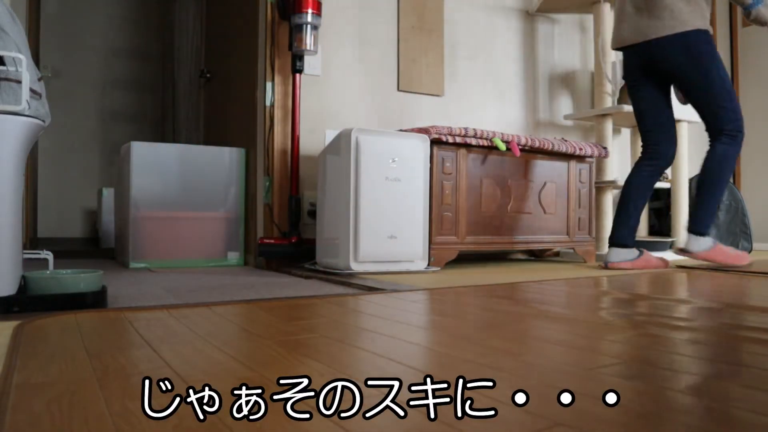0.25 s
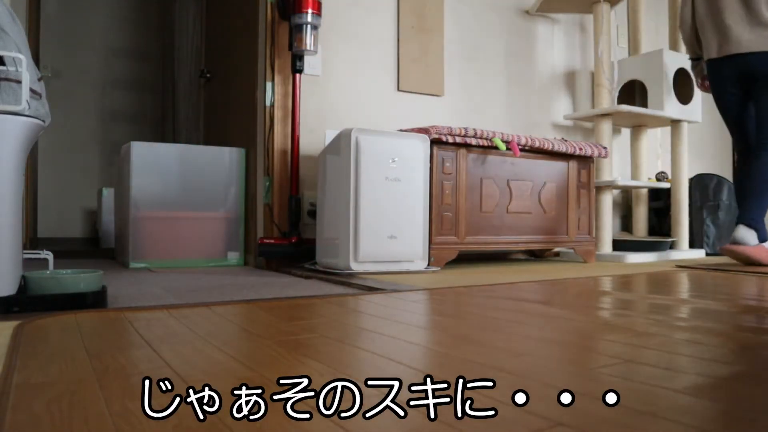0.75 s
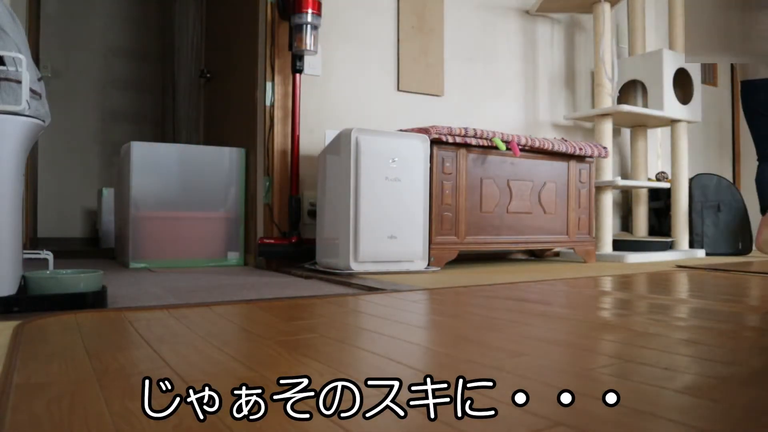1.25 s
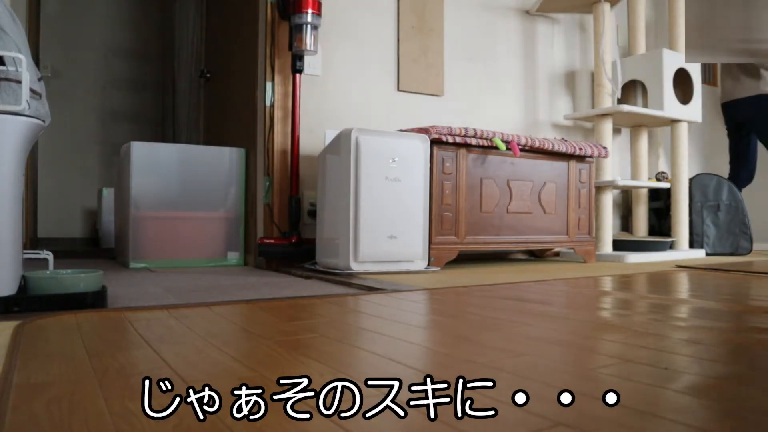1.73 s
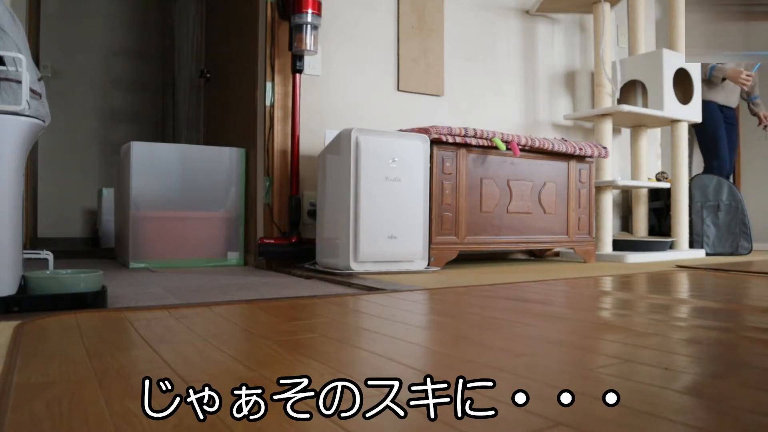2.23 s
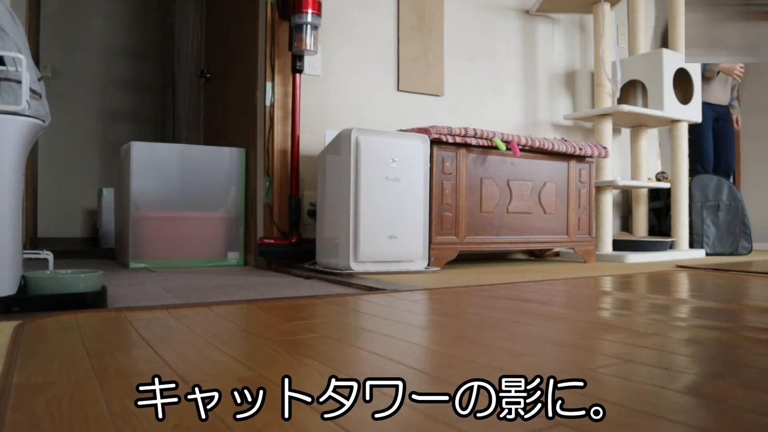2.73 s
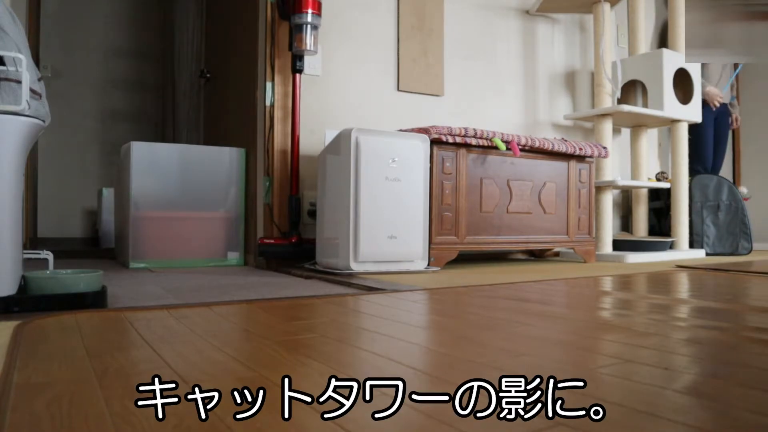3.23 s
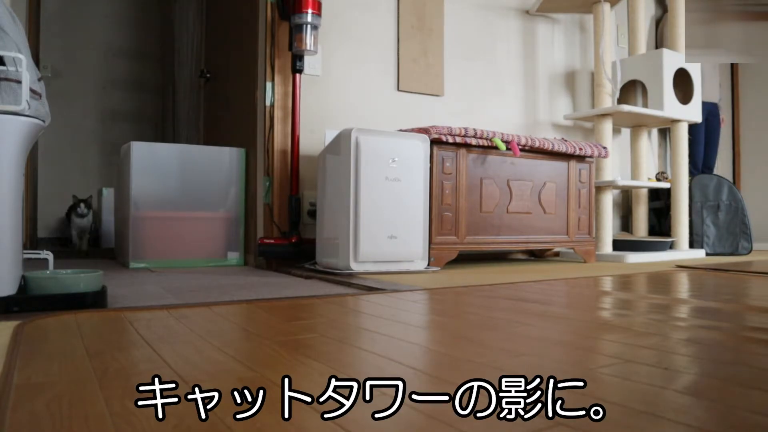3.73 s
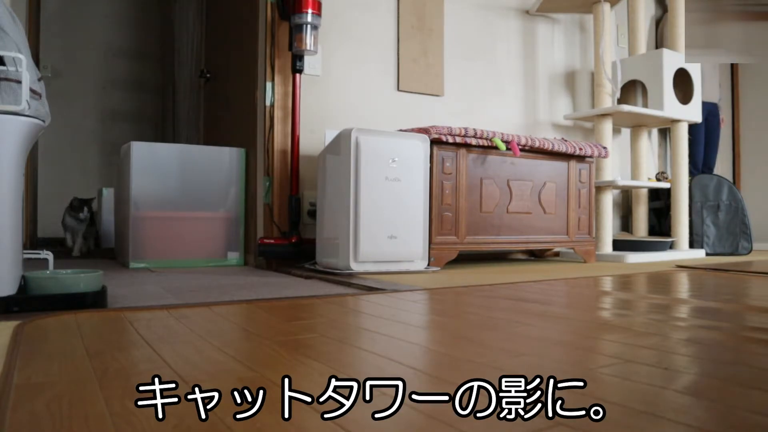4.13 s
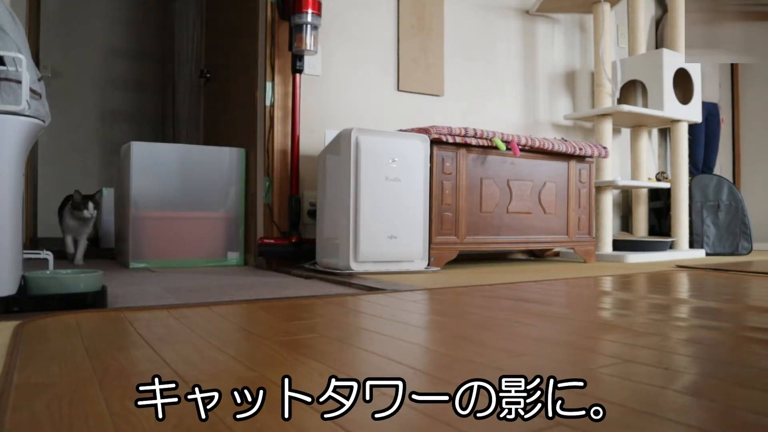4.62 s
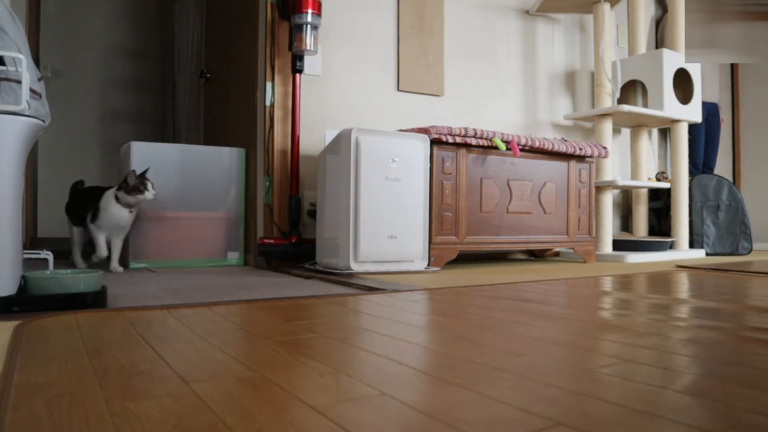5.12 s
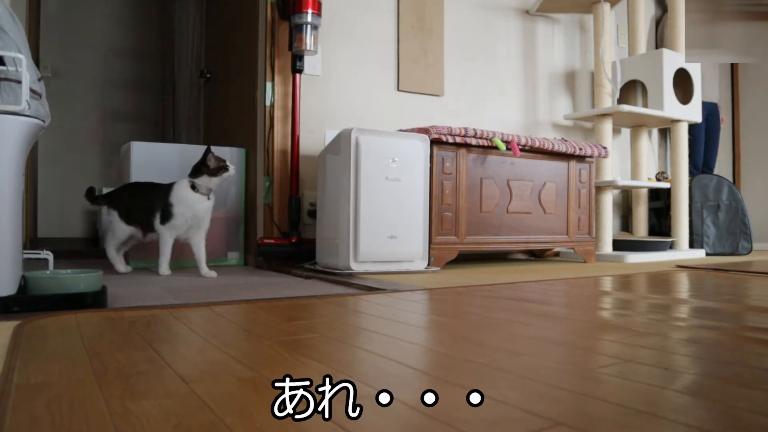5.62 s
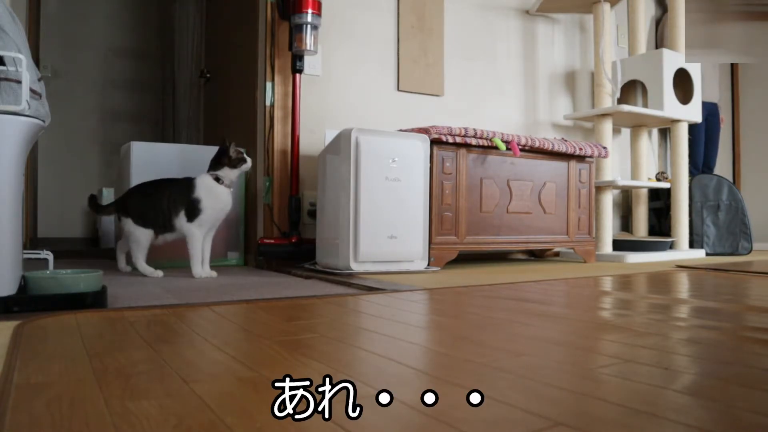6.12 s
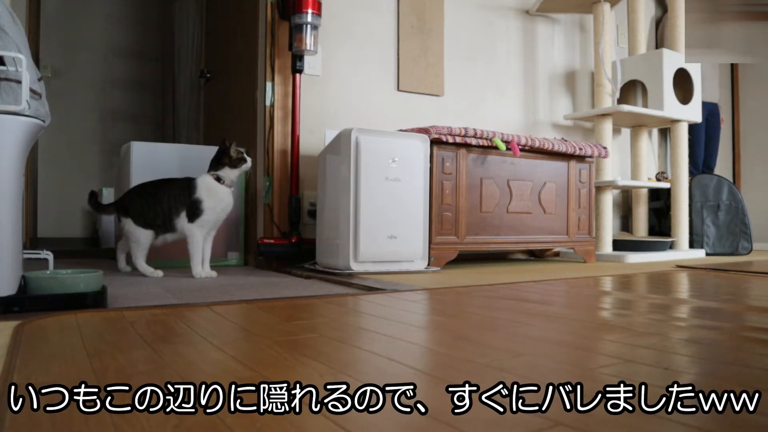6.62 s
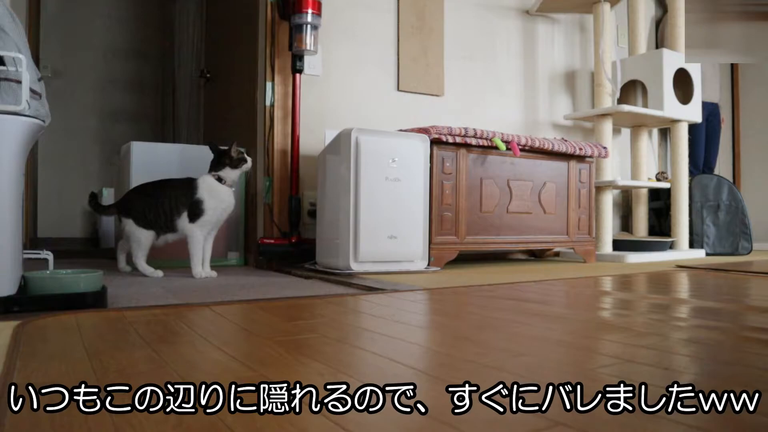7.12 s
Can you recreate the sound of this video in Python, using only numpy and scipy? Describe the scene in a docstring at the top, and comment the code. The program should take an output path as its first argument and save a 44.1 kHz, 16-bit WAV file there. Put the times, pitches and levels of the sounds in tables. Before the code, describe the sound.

Soft slipper shuffles and heel knocks over low room drone, a brief shift to wider air, then a cat's tiny muffled bell tinkling.

```python
"""Slippers and a collar bell in a small room

Felt slippers scuff and pat over a wooden floor: sliding noise, edge ticks and knocks on board modes. Later a cat
walks in; pellet strikes ring its collar bell in short sines. Behind them an appliance hums and drones, air hushes,
and far traffic swells as noise with rising engine tones. The microphone pair hears bass alike and treble largely in
opposite phase; for a moment the background cuts out, returns wide, and soft tinkles and rustles swell."""
import sys
import numpy as np
from scipy import signal
from scipy.fft import rfft, irfft, next_fast_len
from scipy.io import wavfile
from scipy.ndimage import uniform_filter1d, map_coordinates

SR = 44100
rng = np.random.default_rng(int(sys.argv[2]) if len(sys.argv) > 2 else 0)


def pcm_store(signal):
    """Save signal as 16-bit PCM."""
    levels = np.round(np.clip(np.atleast_2d(signal), -1, 1) * 32767)
    wavfile.write(sys.argv[1], SR, levels.astype(np.int16).T)


N = 324576

# Levels of the sources are set at the source, before distance, room and microphone pair.
# soles sliding: (contact [s], slide length [s], level [dB], treble re hiss [dB], scrape re hiss [dB])
SCUFFS = [(0, 0.021, -47.5, 2.5, -16), (0.069, 0.059, -46, -8, 1.5), (0.127, 0.031, -39, 4, -6),
          (0.18, 0.05, -43, -15, -3.5), (0.288, 0.036, -43, -3, -18), (0.348, 0.089, -48, -4, -27),
          (0.43, 0.06, -43.5, -6, -5), (0.49, 0.069, -46, -6, 0), (0.56, 0.026, -39.5, -1.5, -7.5),
          (0.581, 0.034, -39.5, 0.5, -7), (0.637, 0.046, -40, -3, -10), (.695, 0.064, -39, -9, -8),
          (0.777, 0.033, -42, -2.5, -9.5), (0.864, 0.04, -47, 1, -3), (0.975, 0.038, -49.5, 1.5, -27),
          (1.138, 0.02, -47, 2, -15), (1.155, 0.047, -44, -4, -9), (1.374, 0.025, -46, -2, -13),
          (1.402, 0.033, -46, -3, -13), (1.854, 0.022, -49, -4, -3), (1.873, 0.046, -47, -1.5, 3.5),
          (1.929, 0.022, -48, 6, -9)]
# sole edges ticking on the floor: (time [s], level [dB])
EDGE_TICKS = [(0.121, -31), (0.136, -20), (0.141, -21), (0.1574, -34), (0.2094, -40), (0.229, -34),
              (0.288, -31), (0.3136, -23), (0.4174, -37), (0.4476, -29), (0.5656, -41), (0.6615, -32),
              (0.7084, -38), (0.8719, -37), (0.99, -35), (1.3882, -40), (1.9, -38)]
# heels knocking the boards: (time [s], level [dB], hardness [0-1], press [s])
KNOCKS = [(0.158, -22, 0.5, 0.0091), (.208, -26, 1, 0.011), (.225, -30, 1, .006), (0.191, -30, 1, 0.0097),
          (.279, -27, 0.3, .002), (.363, -25, 0.17, 0.014), (.417, -24, 0.45, 0.024),
          (0.5654, -29, 1, .002), (0.5737, -26, 1, 0.0054), (0.592, -29, 0.9, 0.0093),
          (1.3855, -19, 0, 0.0056), (1.392, -20, 0.1, 0.0072), (1.402, -23, 0, .006),
          (1.412, -25.5, 0, 0.0045), (1.9, -21.5, .9, 0.001), (1.905, -21, 0.75, 0.006),
          (1.93, -29, .8, .006), (1.941, -27.5, 0.8, .006), (1.959, -26, 0.4, 0.0032)]
# floor board modes, low three then high three: (frequency [Hz], width [Hz], level [dB])
BOARD_MODES = [(353, 90, 5), (707, 110, 7), (1014, 310, -0.5), (1130, 290, 2), (1740, 800, 2),
               (2440, 1260, 0)]
# colour of felt hissing on wood: (frequency [Hz], relative level [dB per Hz])
FELT_COLOUR = [(1200, -43), (2400, -18), (3180, -0.5), (3850, -4), (5500, -4), (8050, -8), (9200, -10.5),
               (10600, -7.5), (12000, -9.5), (13200, -20), (15500, -55)]
# colour of boards under a loaded sole: (frequency [Hz], relative level [dB per Hz])
SCRAPE_COLOUR = [(600, -48), (1000, -4), (1600, 4.5), (2200, 6), (2800, 2.5), (3600, -37)]
# collar jolts: (time [s], strike level [dB], loss at each rebound [dB], lasting tone under strike [dB])
JOLTS = [(3.958, -44, 12, 14), (3.979, -46, 10, 22), (3.991, -41, 14, 30), (4.0095, -40, 17, 30),
         (4.0185, -30, 15, 30), (4.0232, -22, 25, 30), (4.03, -22.5, 6, 22), (4.0628, -35, 0.5, 25),
         (4.1336, -33, 10, 30), (4.1401, -27, 25, 30), (4.1465, -28.5, 5, 24), (4.193, -31, 3, 25),
         (4.206, -29, 9, 18), (4.218, -40, -2.5, 25), (4.239, -34, 12, 30), (4.2487, -21.5, 5, 23),
         (4.264, -27, 3, 25), (4.2967, -39, 10, 25), (4.466, -47, 8, 20), (4.565, -48, 5, 20),
         (4.59, -47, 5, 20), (4.615, -47, 5, 20), (4.637, -27, 14, 23), (4.698, -30, 17, 30),
         (4.71, -22, 16, 26), (4.7169, -22.5, 5, 28), (4.748, -23, 12, 26), (4.761, -26, 6, 25),
         (4.9003, -42, 8, 21), (4.935, -32, 15, 30), (4.942, -15.5, 20, 15), (4.9476, -17, 6, 25),
         (4.9746, -25, 15, 26), (5.0084, -19.5, 17, 33), (5.126, -43, 13, 30), (5.1366, -37, 15, 25),
         (5.7183, -39.5, 2, 24)]
# partials of the damped bell shell: (frequency [Hz], mean level [dB], t60 [s])
BELL_PARTIALS = [(7626, 2, 0.014), (7800, -8, 0.012), (7470, -6.5, 0.013), (8090, -13.5, 0.015)]
# soft dry swells: (centre time [s], length [s], level before shaping [dB], centre [Hz], width [Hz])
SWELLS = [(3.24, 0.044, -69, 7600, 300), (3.293, .035, -63, 7600, 300), (3.373, .03, -70, 9000, 6000),
          (3.404, 0.057, -49, 7530, 500), (3.428, 0.045, -65, 11500, 1200), (3.413, .012, -53, 5000, 4000),
          (3.447, .015, -57, 3500, 2500), (3.459, 0.028, -50.5, 4040, 2000),
          (3.457, .02, -47.5, 1900, 1300), (3.46, 0.037, -56.5, 8950, 7040), (3.492, 0.028, -51, 7300, 350),
          (3.52, 0.038, -47.5, 7660, 400), (3.545, .035, -55, 7500, 300), (3.6, .02, -64, 9000, 6000)]
# decay of the room: (frequency [Hz], t60 [s])
ROOM_DECAY = [(300, 0.46), (3000, 0.28), (8000, 0.3), (14000, 0.18)]
# side over mid at the microphone pair: (frequency [Hz], level [dB])
PAIR_WIDTH = [(40, -51), (90, -48), (200, -23.5), (380, -7), (700, -7.5), (1290, -2.5), (2380, 1.5),
              (4400, 4), (8120, 6), (15000, 10)]
# side over mid while the background is spread: (frequency [Hz], level [dB])
SPREAD_WIDTH = [(60, -14), (110, -11), (200, -3.5), (380, 1), (700, 0), (1290, -0.5), (2380, -0.5),
                (4400, 0), (8120, -1), (15000, -3)]
# colour change of the spread background: (frequency [Hz], gain [dB])
SPREAD_LIFT = [(100, -5), (800, -5.5), (3000, -2.5), (8000, 0.5), (14000, 8)]
# far traffic coming and going: (time [s], level [dB])
TRAFFIC_LEVEL = [(0, -48), (1.5, -49), (2.9, -49.5), (4.6, -45), (5.5, -41), (6.1, -39.5), (6.5, -40),
                 (7.36, -45.5)]
# colour of far traffic: (frequency [Hz], relative level [dB per Hz])
TRAFFIC_COLOUR = [(200, -30), (450, -2), (600, -14.5), (760, -0.5), (860, -2), (950, -2), (1100, -8),
                  (1700, -9), (2350, -11), (2800, -20), (5000, -37), (9000, -120)]
# engines in the traffic speeding up, one list each: (time [s], pitch [Hz], level [dB])
ENGINES = [
    [(3.75, 49, -52), (4.1, 53.2, -48), (4.45, 56.2, -55), (4.52, 63.4, -56), (4.64, 67.8, -43),
     (5, 71.5, -40), (5.33, 76.7, -44), (5.45, 76.6, -58), (5.7, 79.2, -46), (6, 82, -35), (6.15, 82, -41)],
    [(6.25, 129, -41), (6.4, 130.7, -33), (6.55, 137.6, -30.5), (6.68, 142, -42)],
]
# appliance drone in the room's low resonances: (frequency [Hz], relative level [dB per Hz])
DRONE_COLOUR = [(40, -120), (70, -44), (97, -7), (128, 0.5), (172, -7), (183, -4), (235, 0.5), (255, -11.5),
                (275, -2), (297, -19.5), (315, -10), (368, -24.5), (500, -32.5), (900, -120)]
# colour of the deep rumble: (frequency [Hz], relative level [dB per Hz])
RUMBLE_COLOUR = [(8, -33), (15, -5.5), (43, -1), (70, 4), (95, 2.5), (140, -58), (300, -120)]
# colour of the room's steady air: (frequency [Hz], relative level [dB per Hz])
HUSH_COLOUR = [(150, -57), (300, 3), (420, 0.5), (670, -0.5), (800, -5), (1200, -5.5), (2000, -13.5),
               (3800, -18.5), (6000, -27), (10900, -41.5), (13700, -50), (15500, -83)]

# slides: rise, fading along the slide, fading once the sole lifts
SCUFF_ATTACK_S, SAG_DB_PER_S, LIFT_DB_PER_S = 0.0097, 19, 249
BRIGHTEN_DB_PER_S, LIGHTEN_DB_PER_S = 5, 4  # treble grows and scrape shrinks as weight leaves the sole
DRAG_DB, DRAG_UNTIL_S = -56, 1.58  # faint hiss between the steps
CATCH_HZ, CATCH_WIDTH_HZ, CATCH_GAIN = 3980, 560, 1.94  # the sole's own resonance
KNOCK_T60_S, IMPACT_DB = 0.025, 20  # decay after the press; first instant over the pressing
REBOUND_S = 0.0057  # pellet flights last 0.6 to 1.9 times this
ROLL_START_S, ROLL_END_S, ROLL_DB = 3.6, 4.7, -52  # random faint strikes, at most this level
TONE_HZ, TONE_HOLD_S, TONE_T60_S = 7570, 0.033, 0.04  # lasting tone: mean pitch, hold until fur touches, decay
TICK_DB, TICK_T60_S = -27, 0.003  # dry contact of pellet and shell, under the strike
BELL_TOP_HZ = 12500  # the whole bell is dulled above this
SCATTER_S = 0.004  # mean extra delay of sound scattered off near furniture
SPREAD_START_S, SPREAD_END_S = 3.188, 3.637
RUMBLE_DB, RUMBLE_RISE_DB_PER_S = -44, 0.87  # mean level at the start, slow growth
DRONE_DB, DRONE_RISE_DB_PER_S, HUSH_DB = -33, 0.217, -44.5
HUM_HZ, HUM_DB = 118.3, -43  # the appliance
TOP_HZ = 15700  # band limit of the microphones


def slippers():
    """Felt soles hiss and scrape while they slide, heels knock the boards; edge ticks are returned apart."""
    felt, bright, weight = strokes()
    # fibres catch unevenly
    grit = amp(2 * wobble(300) + 1.5 * wobble(90)) * patchy(depth_db=2.5)

    def felt_response(hz):
        catch = 1 + (CATCH_GAIN - 1) * resonance(hz, CATCH_HZ, CATCH_WIDTH_HZ)
        return amp(along(FELT_COLOUR, hz)) * catch

    hiss = unit(filtered(grit, felt_response))
    treble = filtered(hiss, lambda hz: 1 / (1 + (7500 / (hz + 1)) ** 6))
    scrape = unit(filtered(grit, lambda hz: amp(along(SCRAPE_COLOUR, hz))))
    slide = felt * (hiss - treble) + bright * treble + weight * scrape
    return slide + heel_knocks(), edge_ticks()


def strokes():
    """Gains of felt hiss, its treble and the scrape: each slide rises, sags, then dies as the sole lifts."""
    t, u = np.arange(N) / SR, np.arange(SR // 2) / SR
    drag_db = DRAG_DB - LIFT_DB_PER_S * np.maximum(t - DRAG_UNTIL_S, 0)
    power = np.outer([1, 1, 0.1], amp(2 * drag_db))  # doubled dB gives power
    for s, length, db, bright_db, weight_db in SCUFFS:
        fall_db = SAG_DB_PER_S * u + LIFT_DB_PER_S * np.maximum(u - length, 0)
        shape = np.clip(u / SCUFF_ATTACK_S, 0, 1) * amp(db - fall_db)
        treble_db = bright_db + BRIGHTEN_DB_PER_S * u
        scrape_db = weight_db - LIGHTEN_DB_PER_S * u
        layers = shape * amp([0 * u, treble_db, scrape_db])
        power[:, round(s * SR):][:, :len(u)] += layers ** 2
    return np.sqrt(power)


def patchy(depth_db):
    """White noise whose bands swell and fade in small unrelated patches."""
    z = signal.stft(rng.standard_normal(N + 256), nperseg=256)[2]
    field = uniform_filter1d(rng.standard_normal(z.shape), size=5, axis=0)
    field = uniform_filter1d(field, size=5, axis=1)
    return signal.istft(z * amp(depth_db * unit(field)), nperseg=256)[1][:N]


def heel_knocks():
    """An impact and a noisy press excite damped board modes; hard blows reach the high ones."""
    blows, t = np.zeros((2, N)), np.arange(SR // 10) / SR
    for s, db, hard, press in KNOCKS:
        hard = np.clip(hard, 0, 1)
        envelope = amp(db - 60 * np.maximum(t - press, 0) / KNOCK_T60_S) * (1 - np.exp(-t / 0.001))
        push = envelope * rng.standard_normal(len(t))
        push[0] = amp(db + IMPACT_DB)
        blows[:, round(s * SR):][:, :len(t)] += np.outer([1 - hard, hard], push)

    def wood(f, modes):
        # neighbouring modes alternate in sign
        return sum((-1) ** k * amp(db) * resonance(f, hz, width) for k, (hz, width, db) in enumerate(modes))

    def boards(f):
        low_and_high = np.array([wood(f, BOARD_MODES[:3]), wood(f, BOARD_MODES[3:])])
        return low_and_high / (1 + (f / 4000) ** 4)

    return filtered(blows, boards).sum(axis=0)


def edge_ticks():
    """Sole edges give short noise bursts through one broad resonance."""
    ticks, t = np.zeros(N), np.arange(SR // 10) / SR
    for s, db in EDGE_TICKS:
        ticks[round(s * SR):][:len(t)] += amp(db - 60 * t / 0.012) * rng.standard_normal(len(t))
    return filtered(ticks, lambda f: resonance(f, 5600, 9000) / (1 + (f / 12500) ** 12))


def bell():
    """The shell, damped by fur, rings briefly at each pellet strike; one tone lasts longer after a jolt."""
    out, t = np.zeros(N), np.arange(SR // 20) / SR
    for s, db in pellet_strikes():
        ring = np.zeros(len(t))
        for hz, level, t60 in BELL_PARTIALS:
            ring += amp(level + rng.normal(0, 1.7) - 60 * t / t60) * np.sin(2 * np.pi * hz * t)
        contact = amp(db + TICK_DB - 60 * t / TICK_T60_S) * np.diff(rng.standard_normal(len(t) + 1))
        out[round(s * SR):][:len(t)] += amp(db) * ring * (1 - np.exp(-t / 0.00055)) ** 2 + contact
    u = np.arange(SR // 4) / SR
    for s, db, _, under_db in JOLTS:
        decay = amp(db - under_db - 60 * np.maximum(u - TONE_HOLD_S, 0) / TONE_T60_S)
        tone = decay * np.sin(2 * np.pi * (TONE_HZ + rng.normal(0, 12.6)) * u)
        out[round(s * SR):][:len(u)] += tone * (1 - np.exp(-u / 0.0037))
    return filtered(out, lambda hz: 1 / (1 + (hz / BELL_TOP_HZ) ** 12))


def pellet_strikes():
    """Times and levels of strikes: each jolt with four rebounds, plus faint random ones."""
    flights = np.cumsum(REBOUND_S * rng.uniform(0.6, 1.9, size=(len(JOLTS), 4)), axis=1)
    strikes = []
    for (s, db, loss_db, _), lags in zip(JOLTS, flights):
        strikes += [(s + lag, db - loss_db * k) for k, lag in enumerate([0, *lags])]
    for when, soft in rng.random(size=(30, 2)):
        strikes.append((ROLL_START_S + (ROLL_END_S - ROLL_START_S) * when, ROLL_DB - 6 * soft))
    return strikes


def swells():
    """Blurred tinkles and rustles: band noise under a round envelope, unrelated in mid and side."""
    out, f = np.zeros((2, N)), np.fft.rfftfreq(4096, 1 / SR)
    t = (np.arange(4096) - 2048) / SR
    for s, length, db, hz, width_hz in SWELLS:
        response = resonance(f, hz, width_hz) ** 2 / (1 + (f / 13500) ** 12)
        band = irfft(rfft(rng.standard_normal((2, len(t)))) * response)
        shape = np.cos(np.pi * np.clip(t / length, -0.5, 0.5)) ** 2
        out[:, round((s + t[0]) * SR):][:, :len(t)] += amp(db) * unit(band) * shape
    return out * amp([[0], [3]])  # the side is 3 dB stronger


def heard(x, direct_db, wet_db, wide_db, left, scatter):
    """Source at the pair: side about a quarter cycle ahead, wider with pitch, a share scattered by furniture."""
    knots = np.arange(0, SR / 2, 150)
    # each band of the scattered share arrives after its own delay
    turns = np.cumsum(SCATTER_S * rng.uniform(0, 2, size=len(knots))) * knots[1]
    share = np.clip(scatter, 0, 1)

    def furniture(hz):
        late = np.exp(-2j * np.pi * np.interp(hz, knots, turns))
        return np.sqrt(1 - share) + np.sqrt(share) * late

    direct = np.array([amp(direct_db) * x, filtered(x, furniture)])
    mid, side = direct + amp(wet_db) * room(x)
    return np.array([mid, filtered(side, lambda hz: (1j + left) * amp(along(PAIR_WIDTH, hz) + wide_db))])


def room(x):
    """Mid and side of the room's answer: a noise tail in which each frequency dies at its own speed."""
    hz, t, z = signal.stft(rng.standard_normal((2, SR // 2)), SR, nperseg=256)
    decay = amp(-60 * t / along(ROOM_DECAY, hz)[:, None])
    tail = signal.istft(z * decay, SR, nperseg=256)[1]
    late = np.pad(x, (150, 0))[None]  # the tail sets in 150 samples after the direct sound
    return signal.fftconvolve(late, tail / np.linalg.norm(tail[0]), axes=1)[:, :N]


def background():
    """Mid and side of rumble, drone, air and traffic: unrelated noises of one colour, with shared tones."""
    traffic_db, = curves(TRAFFIC_LEVEL)
    t = np.arange(N) / SR
    air = amp(RUMBLE_DB + RUMBLE_RISE_DB_PER_S * t + 0.52 * wobble(1.5)) * coloured(RUMBLE_COLOUR)
    air += amp(DRONE_DB + DRONE_RISE_DB_PER_S * t + 0.1 * wobble(2.3)) * coloured(DRONE_COLOUR)
    air += amp(HUSH_DB + 0.55 * wobble(7.8)) * coloured(HUSH_COLOUR)
    air += amp(traffic_db) * coloured(TRAFFIC_COLOUR)
    air += tones()
    side = filtered(air[1], lambda hz: amp(along(PAIR_WIDTH, hz)))
    usual = np.array([air[0], side])

    def spread_response(hz):
        return amp(along(SPREAD_LIFT, hz) + [0 * hz, along(SPREAD_WIDTH, hz)])

    wide = filtered(air[::2], spread_response)
    # the usual background cuts out, the wide one fades in, and the usual one returns at once
    cut = np.clip((SPREAD_START_S - t) / 0.00072, 0, 1)
    usual_gain = np.where(t < SPREAD_END_S, cut, 1)
    wide_gain = np.clip((t - SPREAD_START_S) / 0.0072, 0, 1) * (t < SPREAD_END_S)
    return usual_gain * usual + wide_gain * wide


def tones():
    """Sines: the engines' firing tones, fading in and out, and the slightly wavering appliance hum."""
    t = np.arange(N) / SR
    out = amp(HUM_DB + 0.82 * wobble(4.0)) * np.sin(2 * np.pi * HUM_HZ * t + 0.32 * wobble(3.11))
    for rows in ENGINES:
        hz, db = curves(rows)
        fade = np.clip(np.minimum(t - rows[0][0], rows[-1][0] - t) / 0.073, 0, 1)
        out += fade * amp(db + 0.8 * wobble(8)) * np.sin(2 * np.pi * np.cumsum(hz) / SR)
    return np.sqrt(2) * out  # levels count as rms


def coloured(spectrum):
    """Three unrelated noises of one colour, rms 1 together."""
    return unit(filtered(rng.standard_normal((3, N)), lambda hz: amp(along(spectrum, hz))))


def resonance(f, hz, width_hz):
    """Causal response of one damped mode."""
    return 1j * f * width_hz / (hz * hz - f * f + 1j * f * width_hz)


def filtered(x, response):
    """x times a complex response of frequency."""
    m = next_fast_len(N + SR // 2)
    return irfft(rfft(x, m) * response(np.fft.rfftfreq(m, 1 / SR)), m)[..., :N]


def wobble(rate):
    """A smooth random curve, rate knots a second."""
    knots = rng.standard_normal(int(N * rate / SR) + 4)
    return map_coordinates(knots, [np.arange(N) * rate / SR])


def curves(rows):
    """One value per sample for each column after the time."""
    s, *cols = np.transpose(rows)
    return [np.interp(np.arange(N) / SR, s, c) for c in cols]


def along(points, hz):
    """(frequency [Hz], value) points read on a log frequency axis."""
    f, v = np.transpose(points)
    return np.interp(np.log(hz + 1), np.log(f + 1), v)


def unit(x):
    """x at rms 1."""
    return x / np.sqrt(np.mean(x ** 2) + 1e-20)


def amp(db):
    """Gain of a level in dB."""
    return 10 ** (np.asarray(db) / 20)


def scene():
    """All sources at the microphone pair, turned from mid and side into left and right."""
    soles, ticks = slippers()
    feet = heard(soles, direct_db=-3.0, wet_db=-9.5, wide_db=-1.5, left=-0.05, scatter=0.78)
    feet += heard(ticks, direct_db=-5.5, wet_db=-5.5, wide_db=-4.5, left=-0.05, scatter=0)
    collar = heard(bell(), direct_db=-5.5, wet_db=-10.5, wide_db=-4.0, left=0.56, scatter=0)
    mid, side = feet + collar + swells() + background()
    return np.array([mid + side, mid - side])


def record(dry):
    """The microphones pass nothing above their band limit."""
    return filtered(dry, lambda hz: hz < TOP_HZ)


dry = scene()
out = record(dry)
pcm_store(out)
```